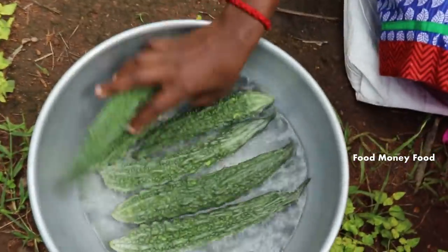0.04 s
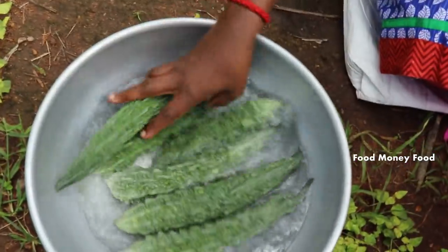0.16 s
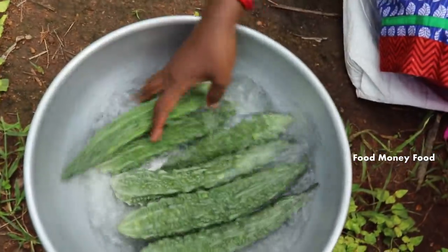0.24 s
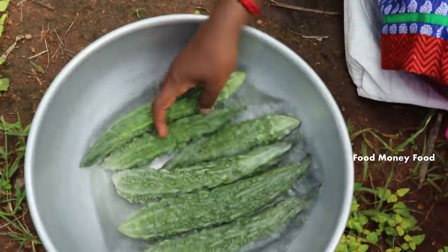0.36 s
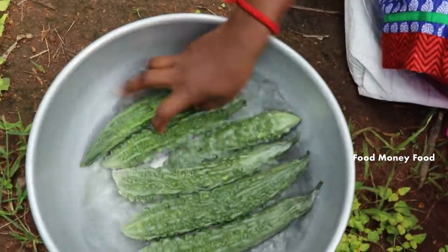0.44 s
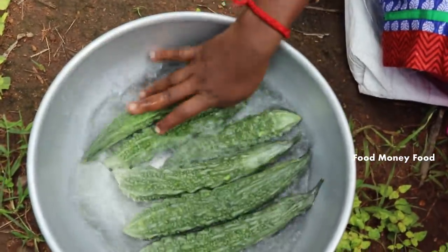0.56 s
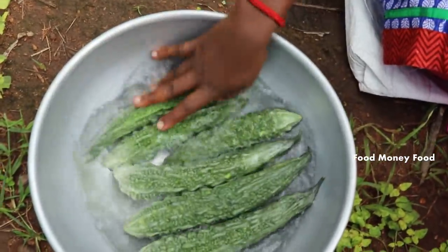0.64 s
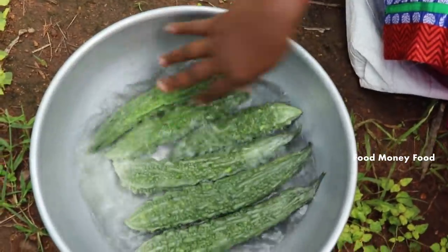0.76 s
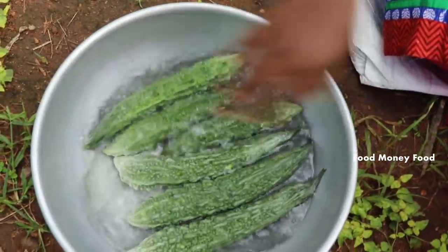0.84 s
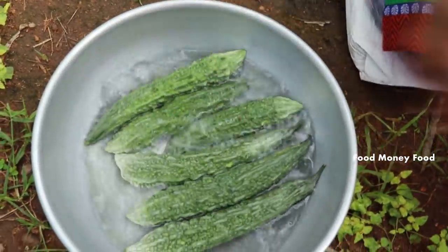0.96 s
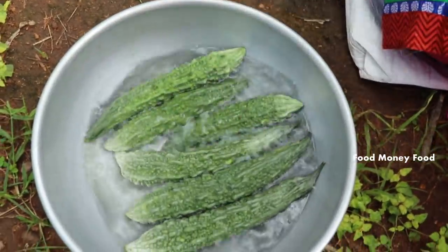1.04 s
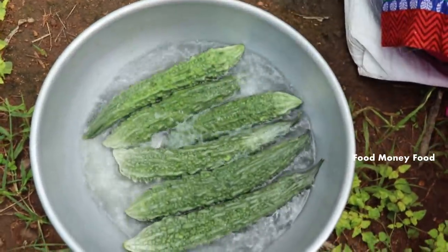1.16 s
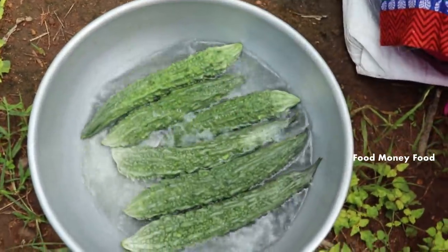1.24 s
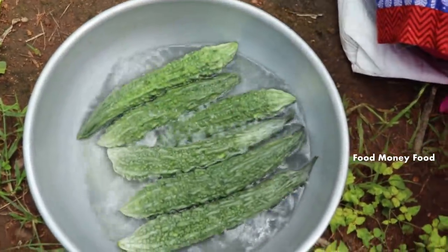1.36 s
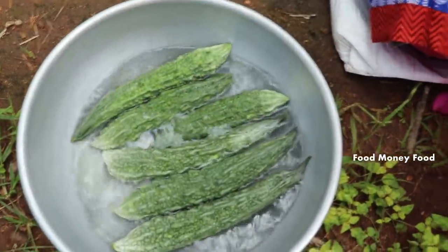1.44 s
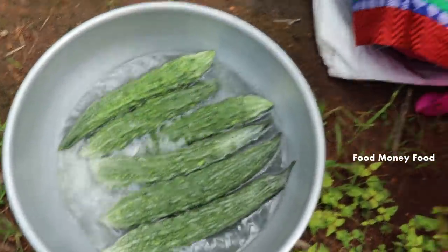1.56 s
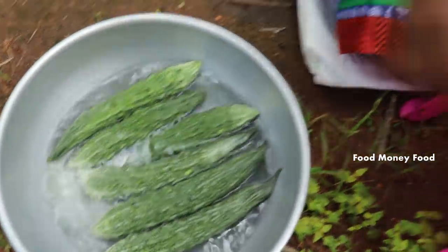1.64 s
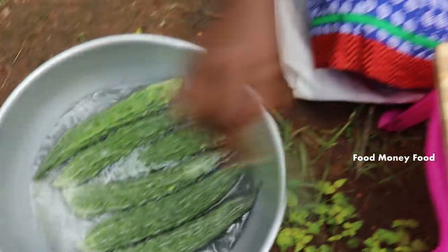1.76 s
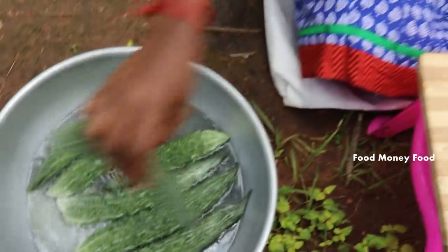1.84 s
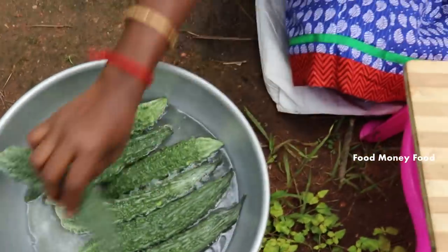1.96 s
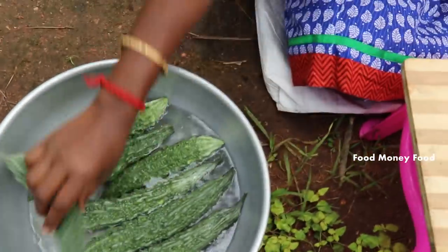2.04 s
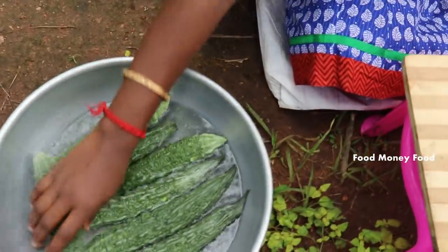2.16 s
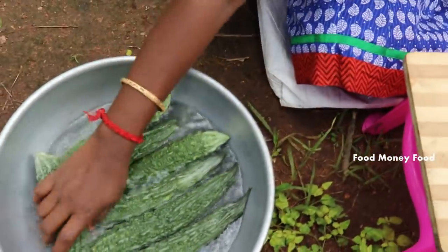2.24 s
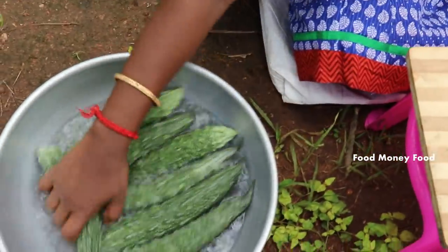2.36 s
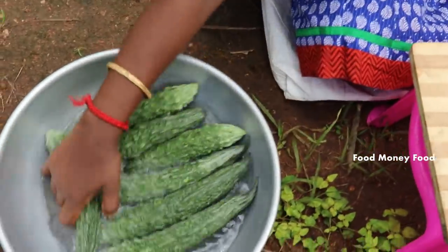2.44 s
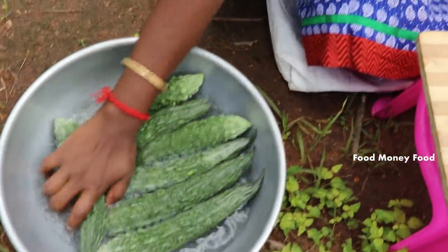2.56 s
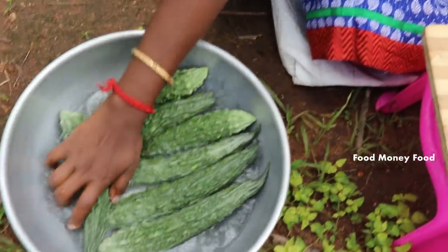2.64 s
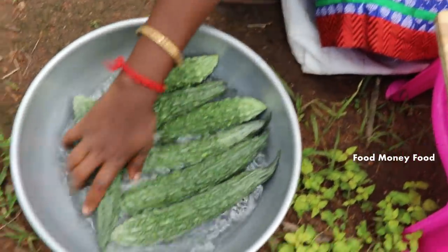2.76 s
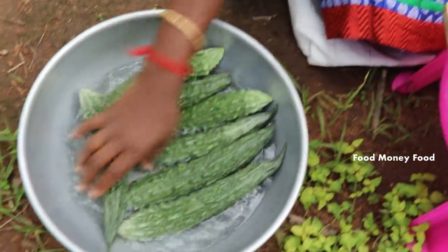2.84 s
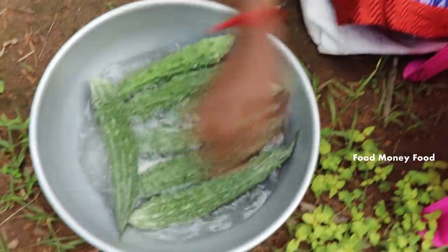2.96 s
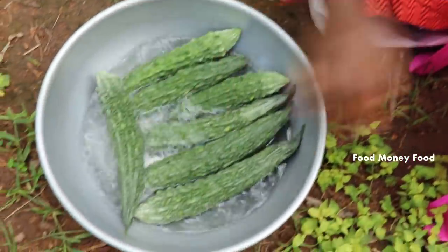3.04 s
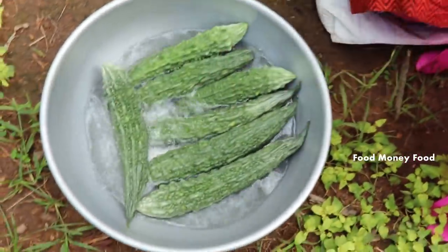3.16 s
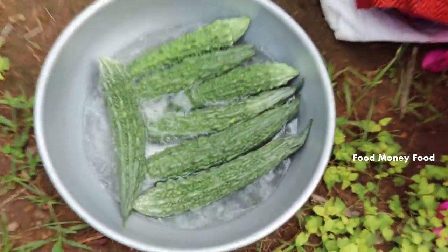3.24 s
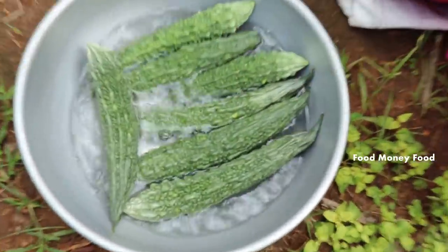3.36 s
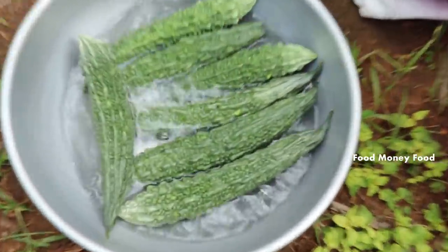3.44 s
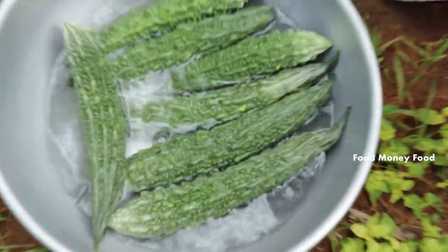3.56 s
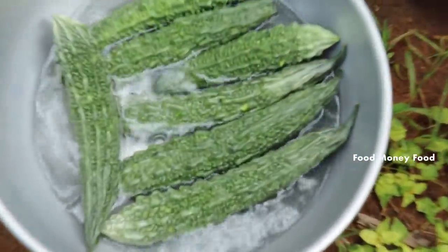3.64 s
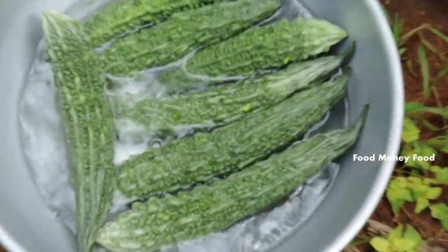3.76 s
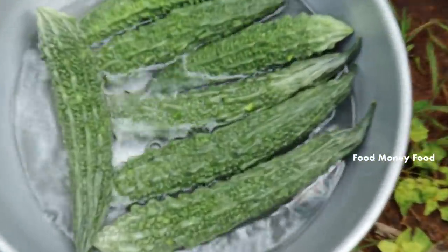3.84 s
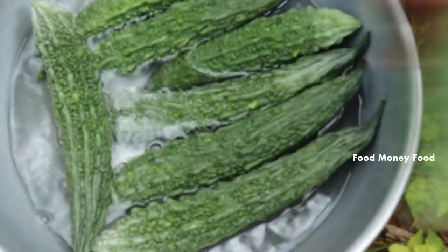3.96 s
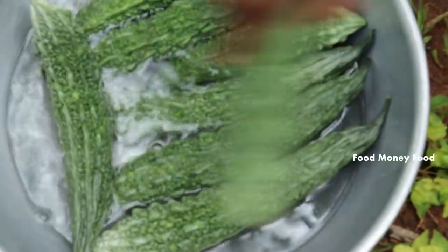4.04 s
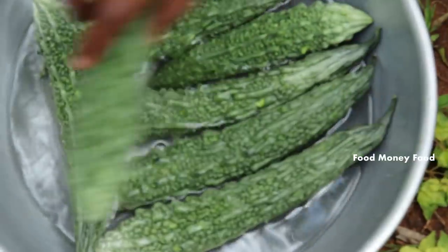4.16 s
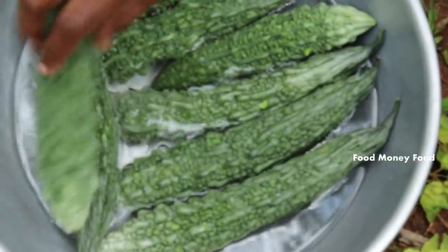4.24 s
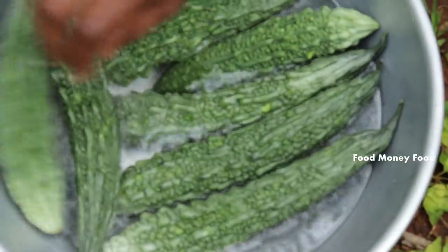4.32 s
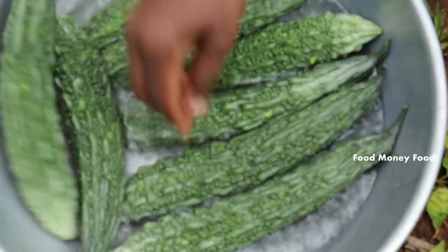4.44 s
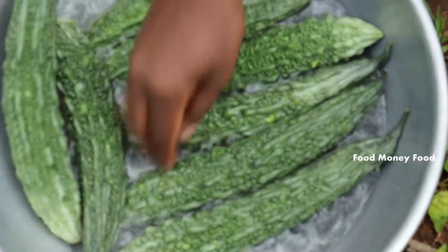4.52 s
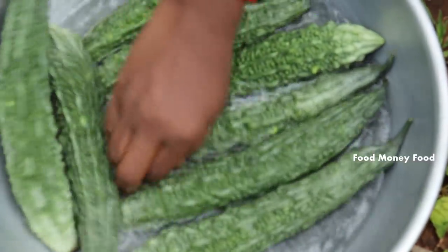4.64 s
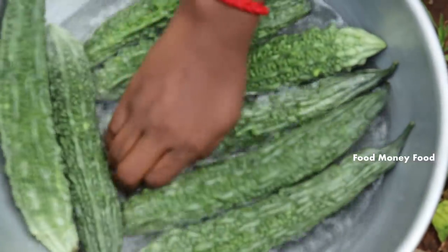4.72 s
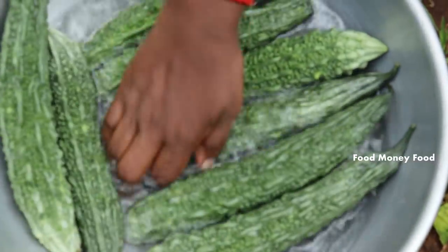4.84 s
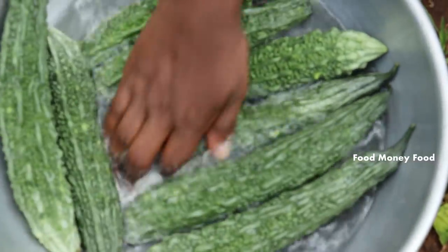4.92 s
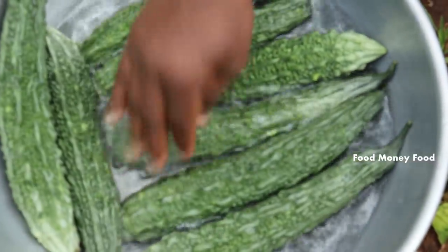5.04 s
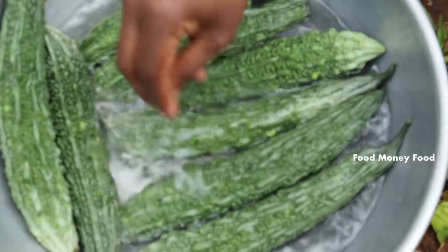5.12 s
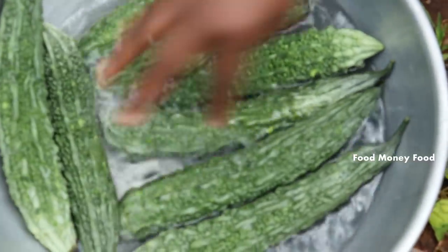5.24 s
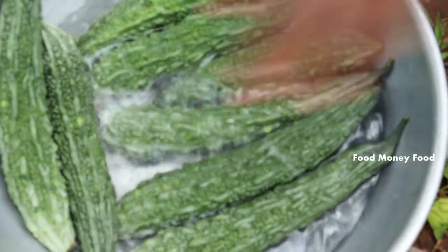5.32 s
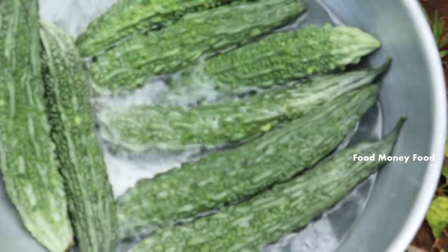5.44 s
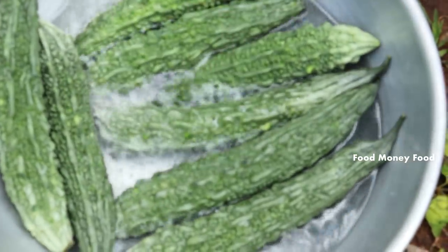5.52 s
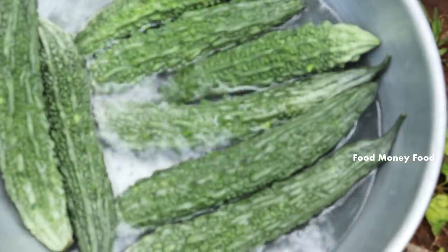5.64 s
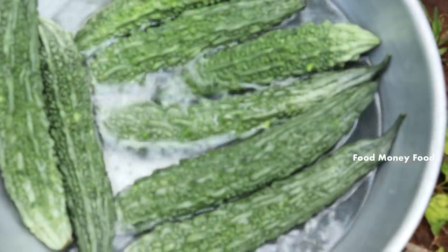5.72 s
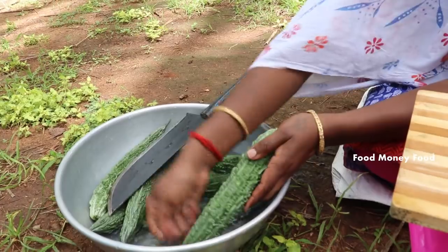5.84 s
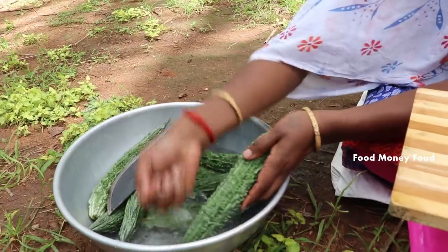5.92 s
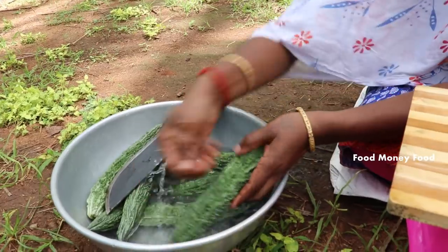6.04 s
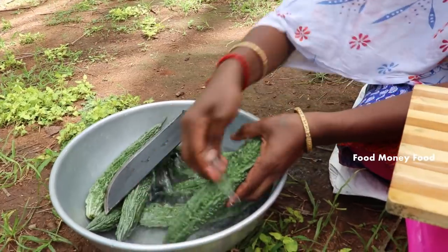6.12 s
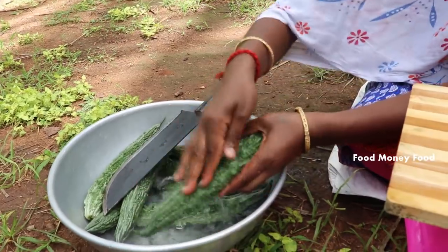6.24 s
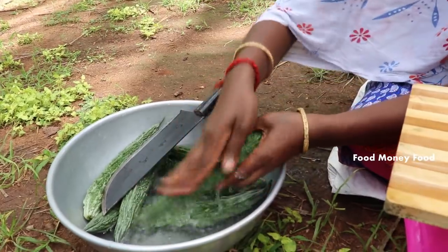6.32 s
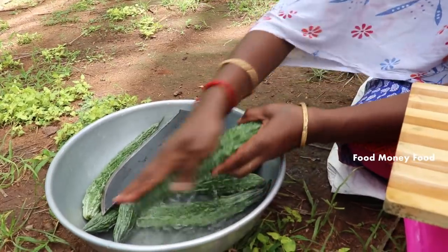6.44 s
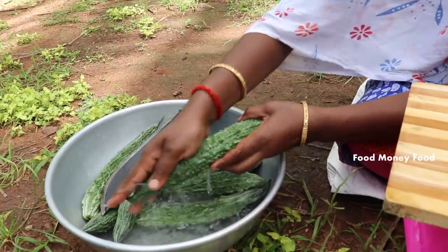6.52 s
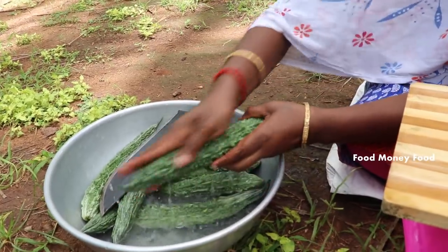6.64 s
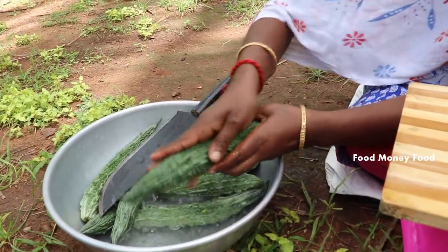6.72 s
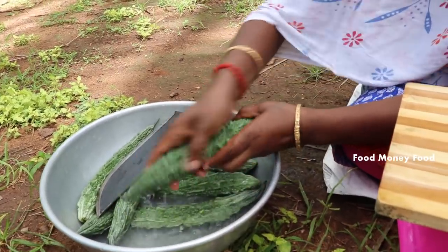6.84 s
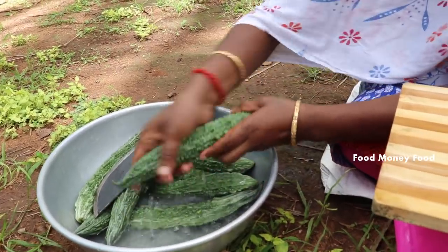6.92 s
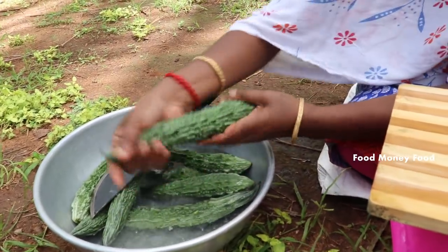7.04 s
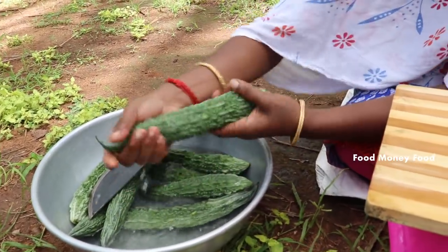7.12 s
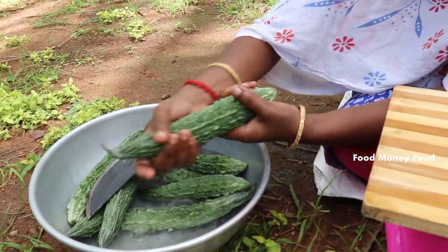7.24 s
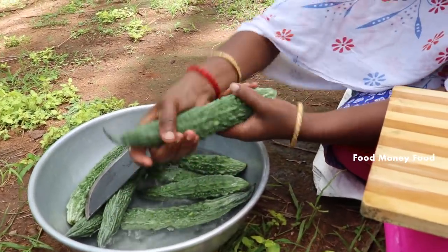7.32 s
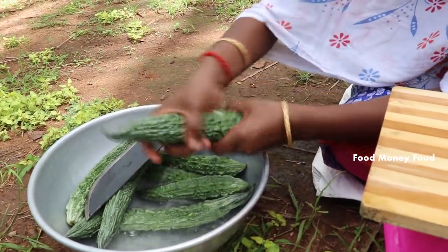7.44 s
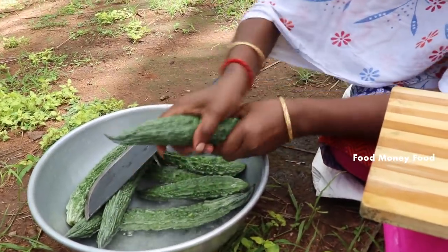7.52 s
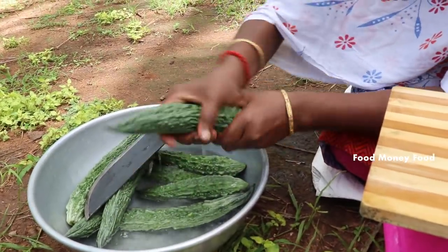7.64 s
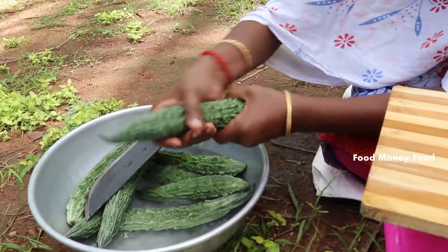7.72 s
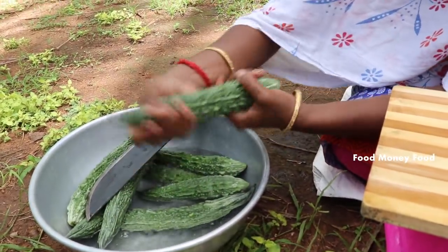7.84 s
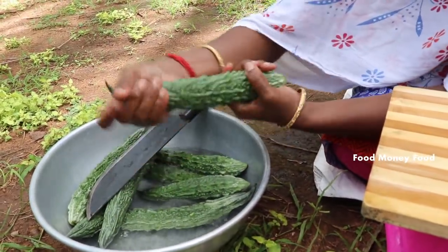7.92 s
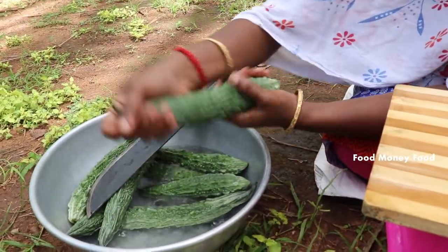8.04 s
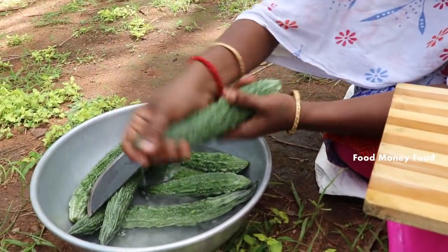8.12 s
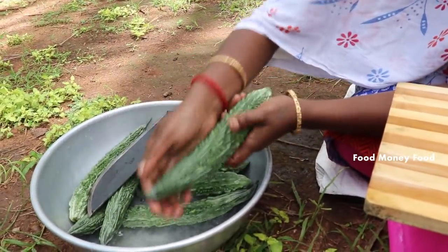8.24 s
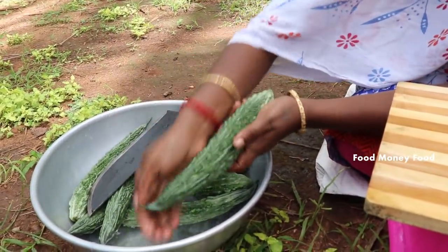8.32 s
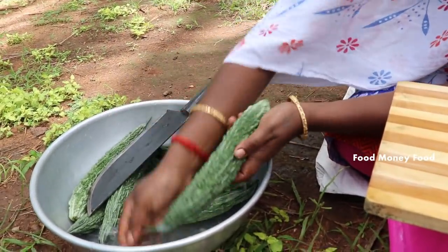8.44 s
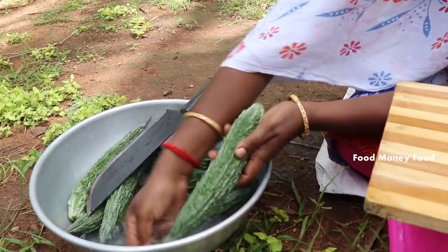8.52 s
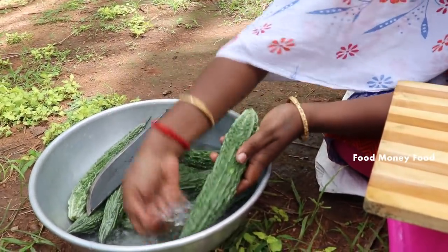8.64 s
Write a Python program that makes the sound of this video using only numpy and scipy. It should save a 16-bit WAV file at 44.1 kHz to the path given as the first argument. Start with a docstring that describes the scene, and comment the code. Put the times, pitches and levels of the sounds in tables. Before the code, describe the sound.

In a garden, water slaps and gurgles close by in a metal bowl as vegetables are pressed down in bursts. Far behind are soft open air, fast regular pump ticks and low hum, with small birds chirping faintly. A hoarse crow calls four times mid-way among knocks and splashes and is cut off suddenly. The hum then throbs louder under plopping bubbles, fine drips, short fizzy rubs of wet skin and a last splash.

```python
"""Hands press knobbly vegetables into a bowl of water: from the start, noise bursts slap, sines ring as bubbles,
and a wet squeak glides up and down. A pump ticks and hums far off throughout, over soft noise of open air.
Small birds whistle in gliding notes from 1.5 s; after 2 s come more splashes, a clink and a rub. From 3.5 s a
crow caws in noisy tones, a low rumble swells and slaps return. Near 5.9 s the crow and its echo stop at once, and
the hum turns louder and throbs. Splashes, drips and rubs of fizzing bubbles follow, then a last splash at 8.5 s."""
import sys
import numpy as np
from scipy import signal
from scipy.fft import rfft, irfft
from scipy.io import wavfile

SR = 44100
rng = np.random.default_rng(int(sys.argv[2]) if len(sys.argv) > 2 else 0)


def generate_wav(sig):
    """Save sig (samples, or channels by samples) to the path in sys.argv[1] as 16-bit PCM at SR."""
    pcm = np.round(np.clip(np.atleast_2d(sig).T, -1, 1) * 32767).astype(np.int16)
    wavfile.write(sys.argv[1], SR, pcm)


N = 382788   # length of the sound in samples
SWITCH_S = 5.855   # the crow stops and the hum grows louder here

# surges of stirred water: (start [s], length [s], bubbling level [dB], hiss level [dB])
SURGES = [(0, 0.25, -42, -43.5), (0.098, 0.64, -44.5, -46.5), (0.31, 0.088, -30, -45),
          (0.448, 0.13, -40, -47), (0.667, 0.048, -45, -48), (2.093, 0.81, -47, -46.5),
          (2.226, 0.1, -51.5, -44.5), (2.401, 0.16, -46, -34.5), (2.571, 0.12, -45.5, -51),
          (3.816, 0.14, -48.5, -49), (4.366, 0.096, -68, -42.5), (4.502, 0.058, -45, -43),
          (4.59, 0.097, -45.5, -48), (4.711, 0.058, -48, -41.5), (5.721, 0.21, -49.5, -52),
          (5.899, 0.18, -50, -49), (6.164, 0.18, -58.5, -46.5), (8.492, 0.1, -45.5, -55),
          (8.575, 0.062, -29.5, -38)]
# palm strokes on wet skin: (start [s], length [s], fizz level [dB], fizz centre at start [Hz], at end [Hz])
STROKES = [(2.837, 0.19, -50, 1740, 1400), (6.422, 0.17, -46, 2700, 2160), (6.691, 0.13, -46, 2200, 2200),
           (6.915, 0.11, -45.5, 2730, 1900), (7.019, 0.17, -47.5, 2070, 1900),
           (7.206, 0.14, -52, 1600, 1800), (7.458, .12, -42.5, 1670, 2340), (7.78, 0.12, -41.5, 1444, 1600),
           (7.884, 0.13, -43, 1520, 3050), (8.114, 0.16, -51, 2880, 1800)]


def from_db(db):
    """Turns a level in dB into a gain."""
    return 10 ** (np.asarray(db) / 20)


def rms_one(x):
    """Scales a sound to an rms of 1."""
    return x / np.sqrt(np.mean(x ** 2) + 1e-20)


def at_hz(points, hz):
    """Reads a table between its points, along a log-frequency axis."""
    points = np.array(points)
    return np.interp(np.log(hz), np.log(points[:, 0]), points[:, 1])


def coloured(x, spectrum):
    """Shapes a sound by a table of levels over frequency, then scales it to rms 1."""
    length = x.shape[-1]
    hz = np.arange(length // 2 + 1) * SR / length + 1   # + 1 avoids the log of zero
    return rms_one(irfft(rfft(x) * from_db(at_hz(spectrum, hz)), length))


def drift(rate_hz):
    """A random wander of rms 1: noise smoothed twice, faster for a higher rate."""
    r = np.exp(-2 * np.pi * rate_hz / SR)
    smooth = signal.lfilter([1], [1, -2 * r, r * r], rng.standard_normal(N + SR))
    return rms_one(smooth[SR:])   # the first second lets the filter settle


def add(out, s, x):
    """Mixes a short sound in at time s, in seconds."""
    i = int(s * SR)
    out[:, i:i + x.shape[1]] += x[:, :N - i]


def gate(t, length, attack_s, release_s):
    """A level that rises, holds and falls in straight lines."""
    return np.clip(np.minimum(t / attack_s, (length + release_s - t) / release_s), 0, 1)


def ports(x, lag, pan_db=0.):
    """Two microphone ports: left hears the sound lag samples after right, and pan_db louder."""
    lag = int(round(lag))
    left, right = np.roll(x, max(lag, 0)), np.roll(x, max(-lag, 0))
    return np.array([left, right]) * from_db([[pan_db / 2], [-pan_db / 2]])


def slaps():
    """Water slaps water, skin and metal: spray noise swells and dies in milliseconds, strongest near a centre."""
    # slaps: (time [s], peak level before panning [dB], centre [Hz], treble level against the body noise [dB])
    slap_list = [(0.094, -15.5, 6340, -6), (0.283, -11, 3120, -71), (0.3257, -18, 1970, -26),
                 (0.334, -4, 2400, -32), (0.352, -23, 2840, -9), (0.4129, -12, 6100, -11),
                 (0.5044, -7.5, 8340, -11), (0.561, -21, 2800, -33), (0.581, -9.5, 5900, -30),
                 (0.6888, -18.5, 2160, -20), (0.706, -25.5, 3400, -32), (.843, -30.5, 2630, -28),
                 (2.1534, -15, 2500, -1), (2.353, -9.5, 1050, -14), (2.406, -22, 1550, -10),
                 (2.4318, -17.5, 2730, -3), (2.4395, -13, 3220, -5), (2.491, -17, 4480, 0),
                 (2.567, -19, 2780, -43), (2.912, -19.5, 2060, -33), (4.332, -21.5, 5050, -18),
                 (4.4028, -2, 5450, -1.5), (4.5188, -22, 3040, -12), (4.62, -17.5, 4930, 0),
                 (4.7666, -21, 6200, -14), (4.79, -22, 3200, -7), (5.806, -16.5, 3330, -44),
                 (6.182, -26, 8400, 1), (6.2467, -17, 9400, -10), (6.275, -8.5, 3560, -40),
                 (6.312, -27.5, 3450, -23), (6.3619, -26.5, 9700, -3), (6.695, -29.5, 2520, -19),
                 (8.489, -19.5, 5800, -10), (8.539, -17, 4300, -21), (8.644, -22, 1800, -16)]
    # tone of the coarse spray: (frequency [Hz], level [dB])
    spray_colour = [(300, -9.5), (1000, -0.5), (4500, -1.5), (9000, -4), (16000, -57)]
    # tone of the finest mist: (frequency [Hz], level [dB])
    mist_colour = [(5000, 9.5), (9000, 16), (12000, 11.5), (15500, 13.5)]
    rise_s, fall_s, mist_pan_db = .0008, 0.0026, -5
    dulling = 0.14   # share of the treble dB (12 dB at least) that the spray loses per octave from its centre
    out, t = np.zeros((2, N)), np.arange(SR // 16) / SR
    hz = np.arange(len(t) // 2 + 1) * SR / len(t) + 1
    swell = (1 - np.exp(-t / rise_s)) * np.exp(-t / fall_s)
    swell /= swell.max()
    for s, db, centre_hz, treble_db in slap_list:
        lag, pan = rng.standard_normal(2)
        noise = rng.standard_normal(len(t))
        octaves = np.log2(hz / centre_hz)
        peak_db = 13 * np.exp(-(octaves / 0.31) ** 2)
        loss_db = dulling * min(treble_db, -12) * np.minimum(np.abs(octaves), 3)
        body = coloured(irfft(rfft(noise) * from_db(peak_db + loss_db), len(t)), spray_colour)
        treble = coloured(noise, mist_colour) * from_db(treble_db)
        body *= swell
        treble *= swell ** 2   # the finest mist is briefest and flies to the right
        gain = from_db(db) / np.abs(body + treble).max()
        both = ports(body, 1.2 * lag - 2, pan) + ports(treble, 0, pan + mist_pan_db)
        add(out, s - rise_s / 2, gain * both)
    return out


def rings(rows, cycles, ragged_db):
    """Dying sines of climbing pitch: each falls 60 dB in the given cycles while its level wavers at random."""
    ragged = from_db(ragged_db * drift(170))
    out, t = np.zeros((2, N)), np.arange(SR // 4) / SR
    for s, db, hz, climb in rows:
        lag, pan = rng.standard_normal(2)
        life = t * hz / cycles
        turns = hz * t * (1 + climb * life / 2)
        decay = from_db(db - 60 * turns / cycles)
        onset = np.minimum(t * hz / 1.1, 1)
        waver = np.resize(ragged[int(s * SR):], len(t))
        add(out, s, ports(decay * waver * np.sin(2 * np.pi * turns) * onset, lag - 2, pan))
    return out


def bubbles():
    """Trapped bubbles ring, climbing in pitch as they near the surface; churning water makes them ragged."""
    # bubbles: (time [s], level before wavering [dB], starting pitch [Hz], pitch climb [share of the start])
    bubble_list = [(.134, -29.5, 1114, 0.6), (.285, -17, 1225, 0.27), (.375, -29, 1045, 0.5),
                   (.505, -22.5, 802, 1.8), (.689, -25, 1200, 0.49), (2.353, -21.5, 817, 0.23),
                   (2.362, -38.5, 484, 1.5), (2.674, -29.5, 860, 0.12), (2.697, -22.5, 1510, 0.56),
                   (2.926, -29, 1420, 0.14), (2.933, -28, 3070, 1.2), (5.123, -19.5, 3600, .2),
                   (5.928, -24, 2690, 0.16), (5.951, -10, 3030, 0.043), (5.981, -17.5, 2520, .02),
                   (6.018, -22.5, 1870, 0.065), (6.273, -16.5, 2225, 6.4), (6.355, -29, 3250, .6),
                   (6.395, -34, 3500, 1.4), (6.461, -25.5, 2380, .05), (6.541, -26, 2360, .05),
                   (6.61, -34, 2350, .05), (7.11, -24, 1890, .04), (8.543, -16, 847, 0.1),
                   (8.573, -20.5, 953, 0.39), (8.581, -22, 1320, 0.72), (8.585, -13, 1850, 0.45),
                   (8.595, -19, 2360, 0.35), (8.613, -17, 1435, 0.081), (8.667, -23, 665, .14)]
    return rings(bubble_list, cycles=57.3, ragged_db=4.0)


def clinks():
    """The bowl clinks: sines that ring for more cycles than the bubbles, with a steadier level."""
    # clinks: (time [s], level before wavering [dB], starting pitch [Hz], pitch climb [share of the start])
    clink_list = [(2.153, -26.5, 2860, 0.016), (2.155, -46, 746, .01), (6.932, -29, 2590, 0.031),
                  (7.359, -36, 844, 0.99)]
    return rings(clink_list, cycles=220, ragged_db=1.5)


def wash(rows, per_s, cycles, spread_octaves, skew, clump_db):
    """Swarms of small bubbles, each a few rising cycles near a centre that may slide, over a clumpy hiss."""
    # tone of the hiss: (frequency [Hz], level [dB])
    hiss_colour = [(700, -5.5), (3500, 5), (9000, -4), (15000, -15.5)]
    out, t = np.zeros((2, N)), np.arange(SR // 40) / SR
    hiss = coloured(rng.standard_normal((2, N)), hiss_colour) * from_db(clump_db * drift(35))
    for s, length, db, centre_hz, end_hz, hiss_db in rows:
        span, count = int(length * SR), int(per_s * length)
        swell = np.sin(np.pi * np.arange(span) / span) ** .7
        at = rng.integers(0, span, count)
        scatter = rng.standard_normal((count, 1))
        scatter = scatter * (1 + skew * (scatter > 0))   # skew: pitches stray further above the centre
        slide_hz = centre_hz + (end_hz - centre_hz) * at[:, None] / span
        hz = np.minimum(slide_hz * 2 ** (spread_octaves * scatter), SR / 3)
        size = from_db(3.3 * np.minimum(rng.exponential(1, (count, 1)), 4)) * swell[at, None]
        size = size * np.sqrt(hz / centre_hz)   # small bubbles die sooner but snap louder
        turns = hz * t
        tones = np.sin(2 * np.pi * turns * (1 + 0.291 * turns / cycles))
        grains = size * from_db(-60 * turns / cycles) * tones
        lag = np.clip(np.round(rng.normal(-2, 3, count)), -8, 8).astype(int)
        swarm = []
        for begin in (at + lag, at):   # left, right
            places = 8 + begin[:, None] + np.arange(len(t))   # 8 spare samples for early lags
            swarm.append(np.bincount(places.ravel(), grains.ravel(), span + len(t) + 16))
        add(out, s, from_db(db) * rms_one(np.array(swarm)))
        start = int(s * SR)
        add(out, s, from_db(hiss_db) * hiss[:, start:start + span] * swell[:N - start])
    return out


def stirred_water():
    """Each surge is a bubble swarm with hiss; louder surges trap larger bubbles, so they sound lower."""
    centre_at_46_hz, hz_per_db = 2829, -42.5   # bubbling centre at -46 dB, and its change with level
    rows = []
    for s, length, db, hiss_db in SURGES:
        hz = centre_at_46_hz + hz_per_db * (db + 46)
        rows.append((s, length, db, hz, hz, hiss_db))
    return wash(rows, per_s=600., cycles=45., spread_octaves=.55, skew=0, clump_db=3.5)


def rubbed_skin():
    """A palm strokes wet skin: sliding bubble fizz and hiss, with a low squelch of bubbles under it."""
    hiss_db, squelch_db, squelch_hz = -1.5, -10.5, 896   # both levels are against the fizz
    rows = [(s, length, db, hz, end_hz, db + hiss_db) for s, length, db, hz, end_hz in STROKES]
    for s, length, db, *_ in STROKES:
        rows.append((s, length, db + squelch_db, squelch_hz, squelch_hz, -np.inf))   # no hiss of its own
    return wash(rows, per_s=1000., cycles=45., spread_octaves=.19, skew=1.8, clump_db=2.5)


def dripping_water():
    """Water runs off a lifted hand, and surges throw up fine droplets: sparse swarms of very short rings."""
    # drips off the hand: (start [s], length [s], level [dB], centre [Hz])
    drip_list = [(0.716, 0.21, -56.5, 5500), (4.897, .5, -59, 9400), (6.17, 0.42, -48.5, 6100),
                 (6.604, 0.36, -59.5, 9100)]
    drip_hiss_db = -2   # against the drips
    spatter_hz, spatter_db = 6950, -7   # droplets of each surge, level against its hiss
    rows = [(s, length, db, hz, hz, db + drip_hiss_db) for s, length, db, hz in drip_list]
    for s, length, _, hiss_db in SURGES:
        rows.append((s, length, hiss_db + spatter_db, spatter_hz, spatter_hz, -np.inf))
    return wash(rows, per_s=140., cycles=14., spread_octaves=.5, skew=0, clump_db=2.5)


def knocks():
    """Dull knocks on bowl and ground: a tone and a noisy rattle die together, reaching the right port first."""
    # knocks: (time [s], starting level of the tone [dB], pitch [Hz])
    knock_list = [(3.285, -36.5, 324), (3.921, -35.5, 344), (4.111, -42, 475), (4.157, -40, 454),
                  (4.376, -39.5, 550), (4.626, -30, 712), (4.705, -35.5, 367), (4.735, -37.5, 880)]
    out, t = np.zeros((2, N)), np.arange(SR // 10) / SR
    for s, db, hz in knock_list:
        noise = rng.standard_normal(len(t))
        rattle = coloured(noise, [(hz / 2, -12), (hz, 0), (3 * hz, -8), (8000, -40)])
        decay = from_db(db - 60 * t / 0.075)   # 60 dB in 75 ms
        add(out, s, ports(decay * (np.sin(2 * np.pi * hz * t) + 1.3 * rattle), 9.2))
    return out


def crow():
    """A harsh voice: each throat band is a sagging, wavering tone torn by noise and a fast rattle."""
    # caws: (start [s], length [s], starting level [dB], starting main tone [Hz], extra level of first band [dB])
    caw_list = [(3.551, 0.39, -43, 1317, -12.5), (4.218, 0.47, -46, 1455, 1.7),
                (4.939, 0.434, -45, 1489, 1), (5.67, .3, -44, 1458, 5)]
    # throat bands: (multiple of the main tone [ratio], noise width [Hz], level [dB], steady part [ratio to noise])
    throat = [(0.999, 40.6, 2.5, 1.63), (1.199, 121, -1, 0.37), (1.39, 81, -2, 0.57),
              (2.25, 410, -9, 0.081)]
    attack_s, release_s, fade_db_per_s, sag_hz_per_s = 0.03, 0.059, 11.5, 480
    out = np.zeros((1, N))
    rattle = 1 + .4 * np.sin(2 * np.pi * 97 * np.arange(N) / SR + 2 * drift(15))
    torn = [(clear + drift(width_hz), drift(width_hz)) for _, width_hz, _, clear in throat]
    waver_hz = 25.37 * drift(9)
    for s, length, level_db, hz, core_db in caw_list:
        t = np.arange(int((length + release_s) * SR)) / SR
        now = int(s * SR) + np.arange(len(t))
        phase = 2 * np.pi * np.cumsum(hz - sag_hz_per_s * t + waver_hz[now]) / SR
        bands = []
        for (k, _, db, _), (a, b) in zip(throat, torn):
            bands.append(from_db(db) * (a[now] * np.cos(k * phase) + b[now] * np.sin(k * phase)))
        voice = (from_db(core_db) * bands[0] + sum(bands[1:])) * rattle[now]
        loudness = from_db(level_db - fade_db_per_s * t) * gate(t, length, attack_s, release_s)
        add(out, s, loudness * voice[None])
    return out[0]


def squeak_and_whistles():
    """A gliding wet squeak, then gliding notes of small birds: quick at first, with a fluttering level."""
    # glides, the first two the squeak: (start [s], length [s], rms level before flutter [dB], start [Hz], end [Hz])
    glide_list = [(0.113, 0.036, -41, 3300, 3800), (0.15, 0.018, -32.5, 3720, 3460),
                  (1.502, 0.029, -53, 3360, 3350), (1.559, 0.019, -53.5, 3430, 3320),
                  (3.555, 0.11, -53.5, 3300, 3520), (3.6, 0.16, -54, 4460, 4220),
                  (3.915, 0.059, -47, 3537, 3480), (5.341, 0.045, -48, 3380, 3440)]
    edge_s = 0.0058
    out, flutter = np.zeros((1, N)), from_db(2.0 * drift(45))   # moving leaves make the birds flutter
    for s, length, db, start_hz, end_hz in glide_list:
        t = np.arange(int((length + edge_s) * SR)) / SR
        glide_hz = start_hz + (end_hz - start_hz) * (t / length) ** 0.77
        tone = np.sin(2 * np.pi * np.cumsum(glide_hz) / SR)
        add(out, s, from_db(db) * np.sqrt(2) * gate(t, length, edge_s, edge_s) * tone[None])
    return out[0] * flutter


def grove(x):
    """Trees and walls scatter sounds into a dying noise tail, its own in each ear."""
    t60_s = 1.6   # time to fall 60 dB
    t = np.arange(SR) / SR
    tail = rng.standard_normal((2, SR)) * from_db(-60 * t / t60_s)
    return signal.fftconvolve(x[None], tail / np.sqrt(np.sum(tail ** 2) / 2))[:, :N]


def ring(clicks, hz, t60_s):
    """A resonator: each click sets off a sine that falls 60 dB in t60_s."""
    r, w = from_db(-60 / (t60_s * SR)), 2 * np.pi * hz / SR
    return signal.lfilter([0, np.sin(w)], [1, -2 * r * np.cos(w), r * r], clicks + 1e-18)


def pump_ticks():
    """A valve ticks once a turn: clicks of varied level pass through two resonators, which softens the onset."""
    start_s, period_s = .0546, .08369
    tick_hz, t60_s, click_db = 2700, 0.0095, -44.5
    clicks = np.zeros(N)
    at = (np.arange(start_s, N / SR, period_s) * SR).astype(int)
    clicks[at] = from_db(click_db + 3 * rng.standard_normal(len(at)))
    once = ring(clicks, tick_hz, t60_s)
    twice = ring(once, tick_hz, t60_s / 2)
    return rms_one(twice) * np.std(once)   # keeps the level of the single ring


def pump_hum():
    """A low tone of wandering strength and phase; after the switch it is louder and throbs."""
    hum_hz, width_hz, throbs_per_s = 127.6, 47, 10
    before_db, after_db = -58, -48.5
    t = np.arange(N) / SR
    near = t > SWITCH_S
    throb = 1 + 0.11 * near * np.sin(2 * np.pi * throbs_per_s * t + 2 * drift(3.4))
    wobble = (0.81 + drift(width_hz)) * np.sin(2 * np.pi * hum_hz * t + 1.17 * drift(0.96))
    return from_db(np.where(near, after_db, before_db)) * rms_one(wobble) * throb


def rumble():
    """A far low rumble swells once: noise in a low band under a bell-shaped level."""
    centre_s, width_s, level_db = 3.59, 0.28, -46
    band = signal.butter(2, [180, 600], "band", fs=SR, output="sos")
    swell = np.exp(-((np.arange(N) / SR - centre_s) / width_s) ** 2)
    return from_db(level_db) * swell * rms_one(signal.sosfilt(band, rng.standard_normal((2, N))))


def air():
    """Far traffic, leaves and microphone hiss: shaped noise, more alike in both ears toward the bass."""
    # tone of the air: (frequency [Hz], level [dB])
    air_colour = [(21, -64), (36, -6.5), (244, -5.5), (386, -14), (1100, -19), (2190, -19.5), (2680, -20.5),
                  (3640, -21), (16000, -38.5)]
    # how alike left and right are: (frequency [Hz], likeness [0 to 1])
    likeness = [(60, 0.79), (290, 0.76), (640, 0.37), (2000, 0.031)]
    mid, side = rfft(coloured(rng.standard_normal((2, N)), air_colour))
    alike = np.clip(at_hz(likeness, np.arange(len(mid)) * SR / N + 1), -1, 1)
    both = np.sqrt(1 + alike) * mid + np.sqrt(1 - alike) * side * [[1], [-1]]
    level_db = -48 + 0.043 * drift(42.0)
    return from_db(level_db) * rms_one(irfft(both, N))


def scene():
    """Mixes the water, the squeak, birds and pump with their echoes, the rumble and the air."""
    near = slaps() + bubbles() + stirred_water() + rubbed_skin() + dripping_water() + clinks() + knocks()
    caws, glides, ticks = crow(), squeak_and_whistles(), pump_ticks()
    before = np.arange(N) / SR < SWITCH_S   # cuts off the crow together with its echo
    crow_far = (ports(caws, -10.5, 2.1) + from_db(-2.0) * grove(caws)) * before
    glides_echoed = ports(glides, 2.67) + from_db(-6.5) * grove(glides)
    pump_far = ticks + from_db(7.5) * grove(ticks) + pump_hum()
    return near + crow_far + glides_echoed + pump_far + rumble() + air()


def record(dry):
    """Cuts the top steeply: everything above 16.5 kHz falls by at least 60 dB."""
    return signal.sosfilt(signal.cheby2(20, 60, 16500, fs=SR, output="sos"), dry)


dry = scene()
out = record(dry)
generate_wav(out)
```